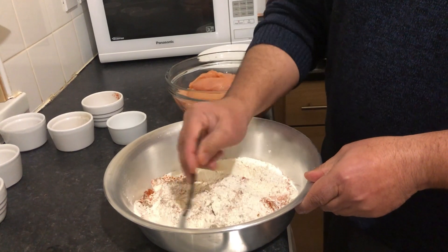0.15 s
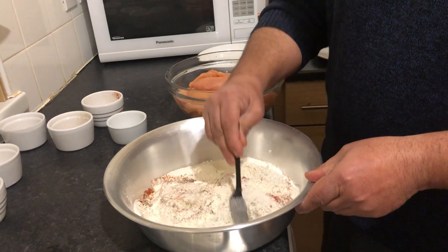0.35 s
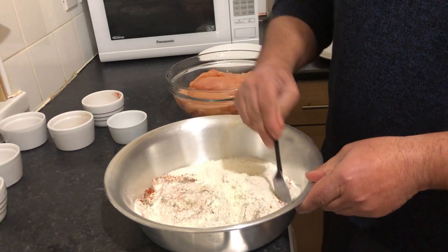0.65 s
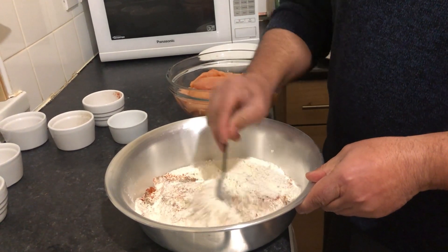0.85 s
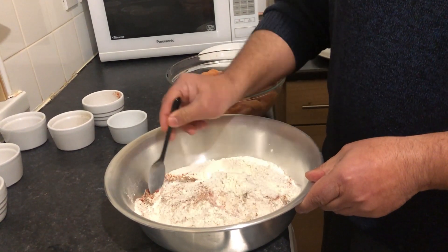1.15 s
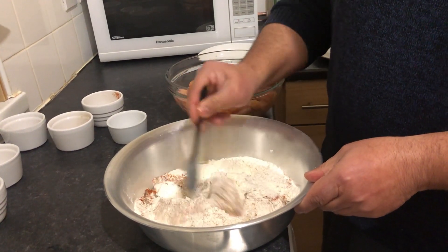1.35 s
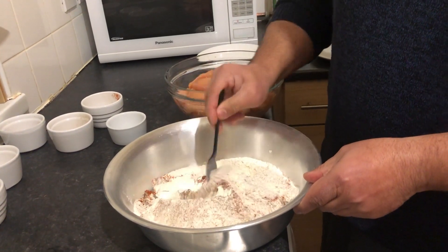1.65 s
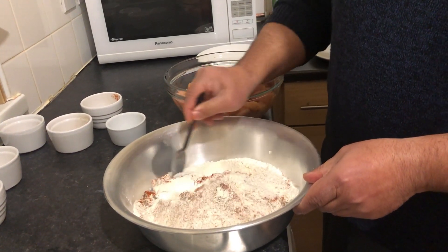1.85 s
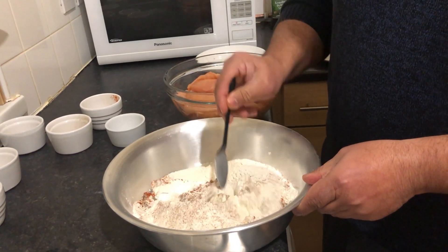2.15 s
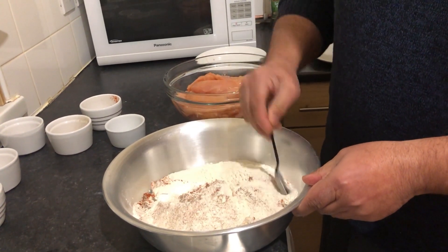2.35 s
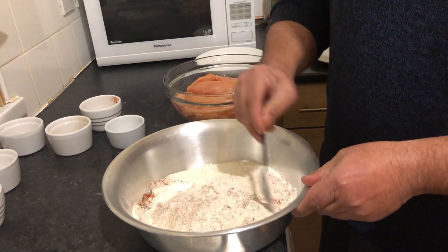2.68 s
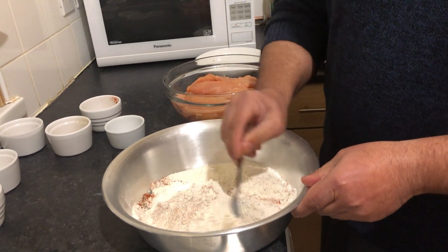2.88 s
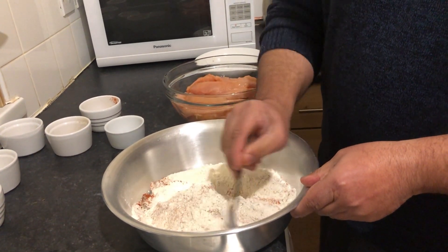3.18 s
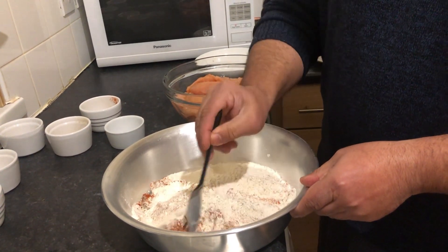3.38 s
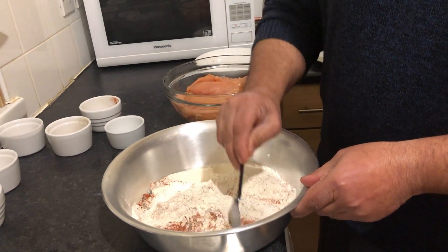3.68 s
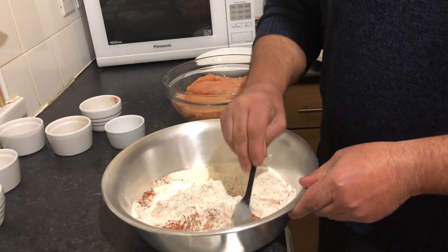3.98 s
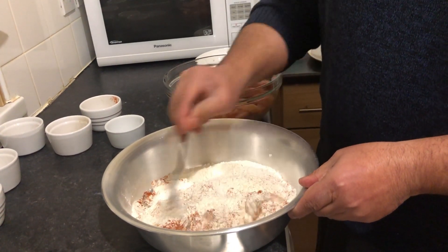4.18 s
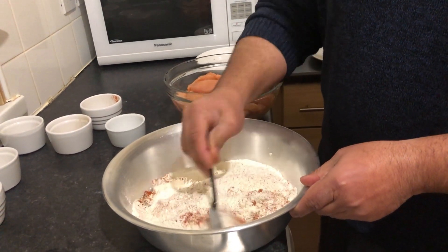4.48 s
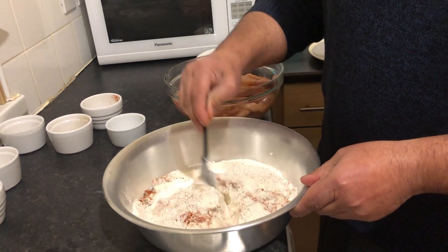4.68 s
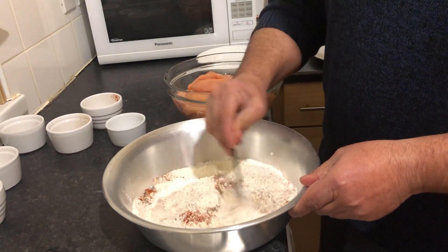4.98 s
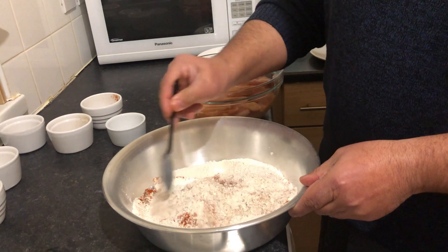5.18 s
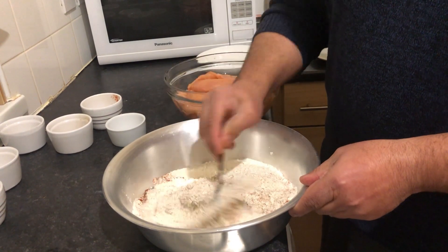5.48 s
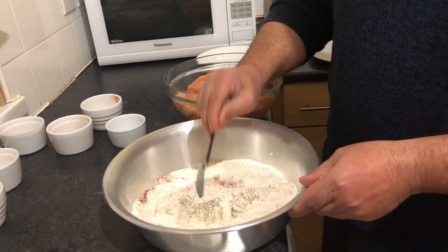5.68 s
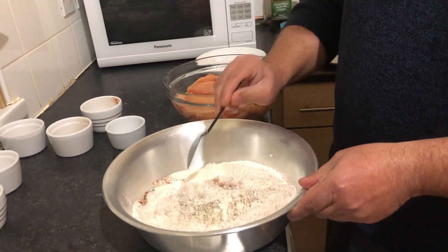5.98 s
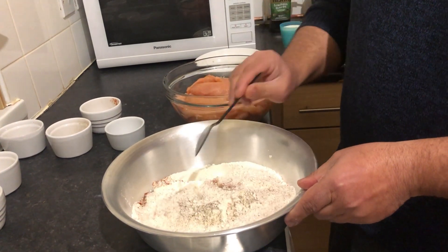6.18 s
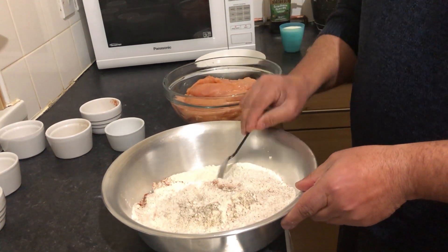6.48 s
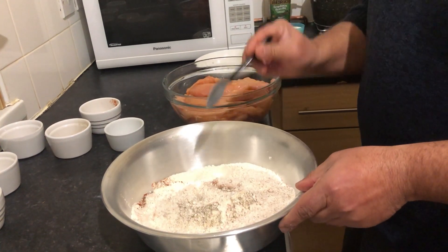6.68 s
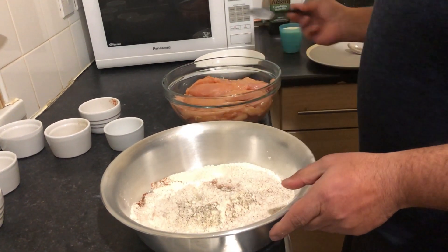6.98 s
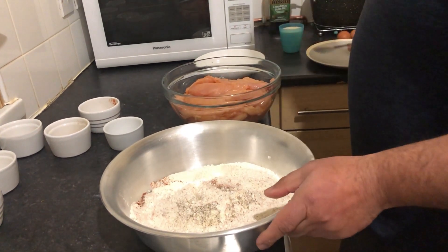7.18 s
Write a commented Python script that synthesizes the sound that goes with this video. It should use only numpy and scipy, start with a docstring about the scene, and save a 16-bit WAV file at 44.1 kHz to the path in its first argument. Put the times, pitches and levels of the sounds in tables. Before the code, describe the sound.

Dry flour is stirred in a steel bowl, the utensil scraping, squeaking briefly and tapping the side in a quietly humming kitchen.

```python
"""A steel fork swishes and digs through flour in a hand-held steel bowl, over an appliance hum.
The swish is tiny slips of powder on steel. The tines tick and skid on the wall, stick and slip in three
squeaks, and are knocked clean; hand and flour damp the bowl's modes. A sleeve rustles, then the fork
clinks on a plate. The tiled kitchen rings on behind it."""
import sys
import numpy as np
from scipy import signal
from scipy.fft import rfft, irfft, next_fast_len
from scipy.io import wavfile

SR = 44100
rng = np.random.default_rng(int(sys.argv[2]) if len(sys.argv) > 2 else 0)


def generate_wav(signal):
    """Clip the signal to [-1, 1] and save it as 16-bit WAV at the path in sys.argv[1]."""
    frames = np.transpose(np.atleast_2d(signal))
    scaled = np.clip(frames, -1, 1) * 32767
    pcm = np.round(scaled).astype(np.int16)
    wavfile.write(sys.argv[1], SR, pcm)


N = 323694
TIME_S = np.arange(N) / SR
HZ = np.fft.rfftfreq(4096, 1 / SR)

# Strokes through flour: (time [s], swell [s], fade [s], level [dB], body [dB], edge [dB])
# Body is high in deep flour, low on bare steel; edge is high when only the tips rub.
FLOUR_STROKES = [(0.161, 0.038, 0.29, -53, 10, 0.5), (0.331, .12, 0.036, -43, -4, 5),
                 (0.722, 0.046, .22, -53.5, 14, 6.5), (1.202, 0.069, .11, -48, 27, 21),
                 (1.582, 0.039, 0.14, -42.5, 4, -2), (1.91, 0.049, 0.012, -42.5, -5, -4),
                 (1.991, 0.039, 0.026, -30, -6.5, -4), (2.451, 0.029, 0.11, -47, 13, 1),
                 (2.833, 0.027, 0.057, -34.5, -9.5, -1), (2.932, 0.061, .084, -60, -5, 2),
                 (3.188, 0.028, 0.13, -50.5, 5, 2), (3.598, 0.089, 0.11, -47.5, 10.5, -3.5),
                 (3.702, 0.062, 0.046, -42.5, 2, 2), (4.027, 0.058, .045, -40, -3.5, 7),
                 (4.389, 0.014, 0.072, -43.5, 5, 8.5), (4.561, 0.045, 0.045, -38, -5.5, -1.5),
                 (4.981, 0.085, 0.062, -52, 20.5, 8), (5.471, 0.045, 0.14, -47, 17, -3),
                 (5.547, 0.04, .11, -51, -3, 14), (5.762, 0.02, .055, -58, -3, 13),
                 (5.953, 0.014, 0.12, -56, -13, 4)]
# Flour grinding on steel: (frequency [Hz], density [dB])
GRIT_SPECTRUM = [(100, -14.5), (400, -10.5), (1000, -8), (2200, 0.5), (4000, -3.5), (7000, -3), (10000, -7),
                 (13000, -9.5), (16000, -22.5)]
# Damped bowl: (frequency [Hz], level [dB], T60 [s])
BOWL_MODES = [(300, -5.5, 0.086), (580, -1.5, 0.047), (950, 2.5, 0.041), (1134, -2.5, 0.017),
              (1318, -8, .05), (1447, -3.5, 0.16), (1709, -11, .04), (2160, -12.5, 0.064),
              (2349, -5, 0.062), (2535, -10.5, 0.046), (2804, -17, 0.076), (3047, -12, 0.17),
              (3350, -6, 0.0089), (3840, -11.5, 0.032), (4570, -17.5, .04), (5630, -5.5, 0.018),
              (6640, -26.5, 0.071), (8960, -15.5, .04)]
# Fork tines: (frequency [Hz], level [dB], T60 [s])
TINE_MODES = [(953, -10, 0.15), (2580, -0.5, .05), (3570, -5.5, .045), (4020, 0.5, 0.057),
              (4260, 0.5, 0.088), (5160, -4.5, 0.06), (7000, 1, 0.097), (7500, 0, .08), (7760, -1, 0.092),
              (9200, -6, 0.094), (10000, 11, 0.036), (12700, -11.5, 0.058)]
# Dull landings on the bottom: (time [s], level [dB], chatter [s])
BOTTOM_DIGS = [(.165, -41.5, 0.004), (0.27, -43, 0.0024), (.371, -45, 0.0024), (2.464, -37.5, 0.011),
               (2.878, -45, 0.0081), (3.225, -43, 0.014), (3.604, -51, 0.0088), (4.5594, -38.5, .0032),
               (4.99, -43.5, 0.0035), (5.408, -38, 0.0042), (5.982, -37.5, .007)]
# Tips catching on bare wall: (time [s], level [dB], chatter [s])
TIP_TICKS = [(1.207, -40.5, 0.0049), (1.213, -34, .008), (1.251, -41.5, 0.0052), (1.272, -34.5, .009),
             (1.584, -45, 0.00048), (2.835, -33, 0.017), (2.8422, -31.5, 0.0095), (4.334, -52, 0.0063),
             (4.394, -44.5, 0.0054)]
# Tone of all ticks: (body [dB], edge [dB], spot [Hz], spot height [dB])
TIP_TONE = (-13.5, 15, 3550, 9)
# Knocks, with one dull dig on the bottom (0.77 s) that rings at its own spot: (time [s], level [dB], chatter
# [s], body [dB], edge [dB], spot [Hz], spot height [dB])
WALL_KNOCKS = [(.7735, -34.5, 0.0026, 9, 3, 1320, 6.5), (4.0257, -21.5, 0.00083, -1, -5, 1500, 8),
               (4.6348, -30.5, 0.0029, -8, -8, 2300, 8.5), (5.469, -29.5, 0.00053, 2, 9.5, 1990, 12),
               (5.569, -33, 0.01, -10, -6, 3420, 1), (6.1807, -29.5, 0.0034, 7.5, -12.5, 1880, 8.5),
               (6.3758, -15, .0034, -4, -14, 3380, 11.5), (6.584, -20.5, 0.0021, -2.5, -15.5, 3310, 9)]
# Fork striking bowl: (frequency [Hz], density [dB])
CONTACT_SPECTRUM = [(60, -24), (200, -14.5), (550, -9.5), (1000, -4), (1700, -2), (3000, -6), (5000, -5),
                    (8000, -12), (11000, -12.5), (16000, -24)]
# Stick-slip on bare steel: (time [s], press [s], ease [s], level [dB], pitch [Hz], crest edge [dB])
STEEL_SQUEAKS = [(1.626, 0.011, 0.019, -19.5, 1397, -5), (1.958, .021, .034, -13.5, 1359, 6.5),
                 (5.45, .007, 0.058, -27.5, 1256, -12)]
# Slip cycle: (harmonic number, level [dB])
SLIP_PARTIALS = [(1, -8), (2, 0), (3, -4.5), (4, -8.5), (5, -11.5), (6, -4), (7, -8), (8, -21), (9, -29),
                 (10, -28)]
# Grit in a squeak: (frequency [Hz], density [dB])
RASP_SPECTRUM = [(100, -33.5), (800, -24.5), (1300, -6.5), (1900, -10), (2700, -1.5), (4200, -0.5),
                 (5000, -3), (7000, 1), (9500, -6), (11000, -10), (16000, -30)]
# Tine skidding on the wall: (time [s], swell [s], fade [s], level [dB], start [Hz], end [Hz])
WALL_SKIDS = [(.38, 0.045, 0.025, -46, 1550, 2390), (2.838, 0.015, 0.026, -39.5, 1880, 2470),
              (4.054, 0.046, 0.009, -39, 2320, 3070), (4.573, 0.034, 0.018, -42, 1330, 2730)]
# Fork laid on a plate: (time [s], level [dB])
PLATE_HIT = (7.3335, -33.5)
# Steel on china: (frequency [Hz], level [dB], T60 [s])
PLATE_MODES = [(3040, 5, 0.027), (5010, -3, 0.021), (6340, 19, 0.014), (10300, 6, 0.011)]
# Sleeve moves, then grip shifts: (time [s], swell [s], fade [s], level [dB], body [dB])
SLEEVE_RUSTLES = [(6.677, .11, 0.13, -55.5, -3), (7.022, 0.025, 0.085, -49, 4)]
# Hand and cloth: (frequency [Hz], density [dB])
SLEEVE_SPECTRUM = [(60, -30), (170, 1.5), (300, 0), (600, -23), (1500, -13.5), (5000, -17.5),
                   (10000, -24.5), (16000, -34)]
# Kitchen decay: (frequency [Hz], T60 [s])
KITCHEN_T60 = [(200, 0.46), (700, 0.43), (1500, 0.42), (3000, 0.37), (6000, 0.39), (10000, 0.24),
               (16000, 0.033)]
# Appliance tones: (frequency [Hz], level [dB])
HUM_LINES = [(99.2, -55), (86.6, -59.5), (149, -70), (194, -70), (241, -70.5), (299, -73), (428.4, -66)]
# Room air: (frequency [Hz], density [dB])
AIR_SPECTRUM = [(15, -54.5), (25, -25), (68, -5.5), (92, -7), (149, -9), (229, -8.5), (373, -13),
                (427, -8.5), (516, -16), (863, -20.5), (1130, -27), (1330, -23), (1940, -31), (9570, -39),
                (16000, -42.5)]
# Background gains, sinking near the end: (time [s], hum [dB], air [dB])
BACKGROUND_GAINS = [(0, 1.5, -4.5), (3, 1, -5.5), (6.3, 2, -5), (6.501, -6, -8.5), (7.301, -9, -5.5)]


def stirring(wall_db=5, spot_hz=2560, usual_stroke_db=-35.5, spot_db_per_db=0.08):
    """Flour grinds between fork and steel; the bowl colours it, and the tines too where flour is thin."""
    out = np.zeros(N)
    wall, tines = mode_peaks(BOWL_MODES, width_hz=55), mode_peaks(TINE_MODES, width_hz=60)
    for time_s, swell_s, fade_s, db, body_db, edge_db in FLOUR_STROKES:
        spot_db = spot_db_per_db * (db - usual_stroke_db) - 1  # a harder stroke wakes the wall
        modes_db = wall_db * wall + max(-body_db, 0) * tines
        shape_db = curve(GRIT_SPECTRUM) + modes_db + touch(body_db, edge_db) + spot(spot_hz, spot_db)
        add(out, time_s, amp(db) * rub(swell_s, fade_s, shape_db))
    return out


def rub(swell_s, fade_s, shape_db):
    """Friction: grains through a spectrum of unit power gain."""
    return colour(grains(swell_s, fade_s), shape_db) / np.sqrt(np.mean(amp(shape_db) ** 2))


def grains(swell_s, fade_s, slips_per_s=4000, clump_db=3.5, foot_db=-15):
    """Tiny clumped slips swell to a crest and die away."""
    t = np.arange(0, swell_s + fade_s, 1 / SR)
    n = len(t)
    sizes = amp(clump_db * drift(n, 110))
    slips = unit_rms(sizes * rng.choice([-1, 1], n) * (rng.random(n) < slips_per_s / SR))
    envelope_db = np.interp(t, [0, swell_s, t[-1]], [foot_db, 0, foot_db])
    return slips * amp(envelope_db) * signal.windows.tukey(n, 0.15)


def taps(ring_db=-9, tine_db=-25, tip_edge_db=5, blow_s=0.0078, usual_chatter_s=0.00097):
    """A click and a short chatter; a dead stop barely rings, and tines ring only when the tips catch."""
    out, t = np.zeros(N), np.arange(SR // 6) / SR
    for time_s, db, chatter_s, body_db, edge_db, spot_hz, spot_db in contacts():
        freedom = np.sqrt(chatter_s / usual_chatter_s)
        rattle = freedom * unit_rms(rng.standard_normal(len(t)) * np.exp(-t / chatter_s))
        click = unit_rms(bending_click(len(t))) / max(freedom, 1)  # softer before a long chatter
        contact = unit_rms(colour(click + rattle, curve(CONTACT_SPECTRUM))[:len(t)])
        bowl = amp(ring_db) * min(freedom, 1) ** 2 * ring(BOWL_MODES, t)
        tines = amp(tine_db) * max(edge_db - tip_edge_db, 0) * ring(TINE_MODES, t)
        shape_db = touch(body_db, edge_db) + spot(spot_hz, spot_db)
        blow = unit_rms(colour(contact + bowl, shape_db)[:len(t)]) + tines
        add(out, time_s, amp(db) * np.sqrt(blow_s * SR) * blow / np.linalg.norm(blow))
    return out


def contacts(dig_body_db=13, dig_edge_db=4.5, dulling_db_per_s=700):
    """Digs, ticks and knocks in the columns of WALL_KNOCKS; a longer drag dulls a dig's edge."""
    no_spot = (1280, 0)
    digs = [(time_s, db, chatter_s, dig_body_db, dig_edge_db - dulling_db_per_s * chatter_s, *no_spot)
            for time_s, db, chatter_s in BOTTOM_DIGS]
    ticks = [(*tick, *TIP_TONE) for tick in TIP_TICKS]
    return digs + ticks + list(WALL_KNOCKS)


def bending_click(n, lag_s=0.001147):
    """Bending waves in thin steel bring the treble first, 1 kHz after lag_s."""
    hz = np.fft.rfftfreq(n, 1 / SR)
    highpass = hz / (hz + 100)
    return irfft(highpass * np.exp(-4j * np.pi * lag_s * np.sqrt(1000 * hz)), n)


def ring(modes, t, spread_db=3.5):
    """Decaying modes at rms 1; their shares vary from blow to blow."""
    hz, db, t60_s = np.transpose(modes)[:, :, None]
    gains = amp(db + spread_db * rng.standard_normal(hz.shape)) * rng.choice([-1, 1], hz.shape)
    return unit_rms((gains * np.exp(-np.log(1000) * t / t60_s) * np.sin(2 * np.pi * hz * t)).sum(0))


def touch(body_db, edge_db, hz=HZ, body_hz=1100, edge_hz=5000):
    """Two shelves [dB]: a firm push moves the whole bowl (body); a tine tip sounds bright (edge)."""
    return body_db / (1 + (hz / body_hz) ** 4) + edge_db * (1 - 1 / (1 + (hz / edge_hz) ** 4))


def spot(hz, height_db, relative_width=0.14):
    """One broad resonance [dB] of the patch of wall under the fork."""
    return height_db / (1 + ((HZ - hz) / (relative_width * hz)) ** 2)


def mode_peaks(modes, width_hz):
    """Resonance curve: 1 at each mode, toward 0 between."""
    return np.max([1 / (1 + ((HZ - hz) / width_hz) ** 2) for hz, _, _ in modes], 0)


def squeaks(swell_db_per_s=329, ease_db=12, catch_s=0.006, release_s=0.007,
            lift_hz_per_s=4900, max_lift_hz=80, jitter=0.02, shimmer=0.2, rasp_db=-8):
    """Stick-slip with a puff of grit per cycle; it swells, then lifts and dulls as the hand eases."""
    out = np.zeros(N)
    for time_s, press_s, ease_s, db, crest_hz, crest_edge_db in STEEL_SQUEAKS:
        t = np.arange(-press_s, ease_s, 1 / SR)  # zero at the crest
        n = len(t)
        slack_db = np.maximum(-swell_db_per_s * t, ease_db * t / ease_s)
        grip = np.clip(np.minimum((t + press_s) / catch_s, (ease_s - t) / release_s), 0, 1)
        hz = crest_hz + np.clip(lift_hz_per_s * t, 0, max_lift_hz)
        edge_db = crest_edge_db - 0.74 * slack_db
        rolloff_db_per_octave = 0.6 * slack_db  # a slack tine slips more smoothly
        cycles = np.cumsum(hz * (1 + jitter * drift(n, 500))) / SR
        tone = np.zeros(n)
        for k, partial_db in SLIP_PARTIALS:
            gain = amp(partial_db + touch(0, edge_db, k * hz) - rolloff_db_per_octave * np.log2(k))
            flutter = 1 + shimmer * drift(n, 240)
            tone += gain * flutter * np.cos(2 * np.pi * (k * cycles + rng.random()))
        puffs = rng.standard_normal(n) * np.exp(-(cycles % 1) / 0.2)
        rasp = amp(rasp_db) * unit_rms(colour(puffs, curve(RASP_SPECTRUM))[:n])
        add(out, time_s, grip * amp(db - slack_db) * (unit_rms(tone) + rasp))
    return out


def skids(width_hz=450):
    """Slips pass a resonance that climbs as the tine is pressed harder."""
    out = np.zeros(N)
    pole = np.exp(-np.pi * width_hz / SR)
    for time_s, swell_s, fade_s, db, start_hz, end_hz in WALL_SKIDS:
        slips = grains(swell_s, fade_s)
        sweep = np.exp(2j * np.pi * np.cumsum(np.linspace(start_hz, end_hz, len(slips))) / SR)
        rasp = (sweep * signal.lfilter([1], np.poly([pole, pole]), slips / sweep)).real
        add(out, time_s, amp(db) * rasp / (2 * np.std(rasp)) * signal.windows.tukey(len(rasp), 0.1))
    return out


def plate():
    """One light clink of steel on china."""
    out = np.zeros(N)
    time_s, db = PLATE_HIT
    clink = ring(PLATE_MODES, np.arange(SR // 10) / SR)
    add(out, time_s, amp(db) * clink / np.std(clink[:SR // 100]))
    return out


def sleeve():
    """Soft friction of hand and cloth."""
    out = np.zeros(N)
    for time_s, swell_s, fade_s, db, body_db in SLEEVE_RUSTLES:
        add(out, time_s, amp(db) * rub(swell_s, fade_s, curve(SLEEVE_SPECTRUM) + touch(body_db, 0)))
    return out


def kitchen(x, echoes_per_s=5000, first_s=0.0037, early_db=4, early_s=0.024):
    """Dense reflections, strongest early from counter and tiles; each band decays at its own rate."""
    t = np.arange(SR) / SR
    echoes = rng.choice([-1, 1], SR) * (rng.random(SR) < echoes_per_s / SR) * (t > first_s)
    early_gain = amp(early_db * np.exp(-t / early_s))
    hz, frame_s, bands = signal.stft(echoes * early_gain, SR, nperseg=256)
    decay = np.exp(-np.log(1000) * frame_s / curve(KITCHEN_T60, hz)[:, None])
    tail = signal.istft(bands * decay, SR, nperseg=256)[1]
    return signal.fftconvolve(x, tail / np.linalg.norm(tail))[:N]


def hum_and_air(waver=0.27, wander_hz=0.5, air_base_db=-53):
    """Two low motor tones beat under faint higher lines and the air of the room."""
    time_s, hum_db, air_db = np.transpose(BACKGROUND_GAINS)
    hum = np.zeros(N)
    for hz, db in HUM_LINES:
        gain = np.sqrt(2) * amp(db) * (1 + waver * drift(N, 19))
        cycles = np.cumsum(hz + wander_hz * drift(N, 4)) / SR + rng.random()
        hum += gain * np.sin(2 * np.pi * cycles)
    hum *= amp(np.interp(TIME_S, time_s, hum_db))
    air = unit_rms(colour(rng.standard_normal(N), curve(AIR_SPECTRUM))[:N])
    return hum + amp(air_base_db + np.interp(TIME_S, time_s, air_db)) * air


def amp(db):
    """Decibels to gain."""
    return 10 ** (np.asarray(db) / 20)


def unit_rms(x):
    """Scale to rms 1."""
    return x / np.sqrt(np.mean(x ** 2) + 1e-20)


def curve(points, hz=HZ):
    """Interpolate a table over log frequency."""
    point_hz, values = np.transpose(points)
    return np.interp(np.log(hz + 1), np.log(point_hz + 1), values)


def add(mix, time_s, sound):
    """Mix a sound in at time_s."""
    part = mix[max(round(time_s * SR), 0):][:len(sound)]
    part += sound[:len(part)]


def colour(x, gain_db):
    """Minimum-phase filter; gain_db lies on the HZ grid."""
    log_gain = np.log(amp(np.r_[gain_db, gain_db[-2:0:-1]]))
    response = np.exp(np.conj(signal.hilbert(log_gain)))
    return signal.fftconvolve(x, np.fft.ifft(response).real[:len(HZ)])


def drift(n, rate_hz):
    """Smooth noise, rms about 1, rolling off at rate_hz."""
    size = next_fast_len(n + SR)
    lowpass = np.exp(-(np.fft.rfftfreq(size, 1 / SR) / rate_hz) ** 2)
    return unit_rms(irfft(rfft(rng.standard_normal(size)) * lowpass, size))[:n]


def scene(tap_send_db=-7, squeak_send_db=-11, stir_send_db=-8):
    """Fork and bowl close by, the room behind; mono."""
    tapping = taps() + plate()
    squeaking = squeaks()
    swishing = stirring() + skids() + sleeve()
    send = amp(tap_send_db) * tapping + amp(squeak_send_db) * squeaking + amp(stir_send_db) * swishing
    return (tapping + squeaking + swishing + kitchen(send) + hum_and_air())[None]


def record(dry):
    """Low-pass at 16.1 kHz."""
    lowpass = signal.firwin(255, 16100, window=("kaiser", 9), fs=SR)
    return signal.oaconvolve(dry, lowpass[None], "same")


dry = scene()
out = record(dry)
generate_wav(out)
```